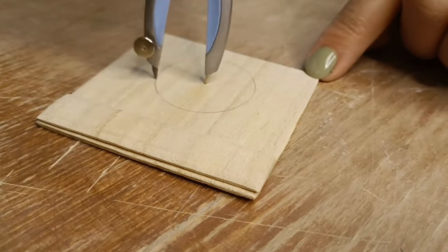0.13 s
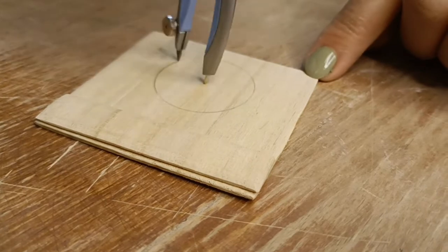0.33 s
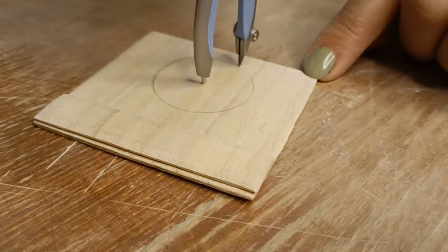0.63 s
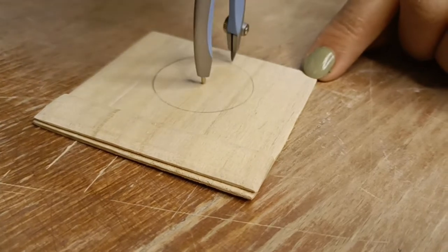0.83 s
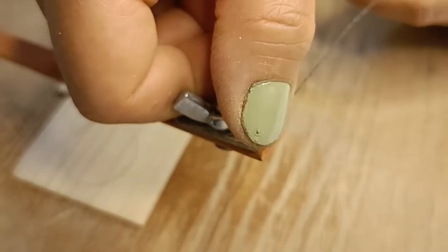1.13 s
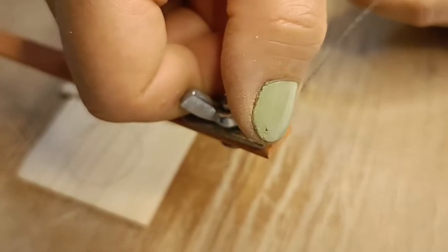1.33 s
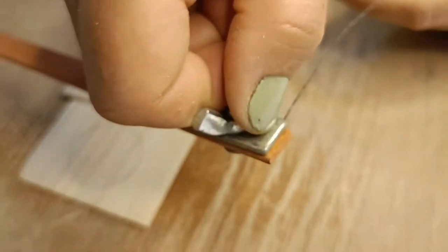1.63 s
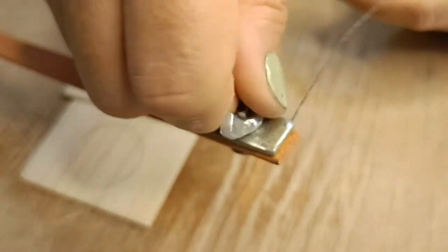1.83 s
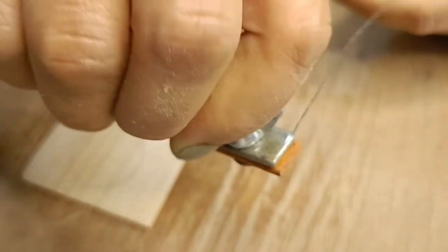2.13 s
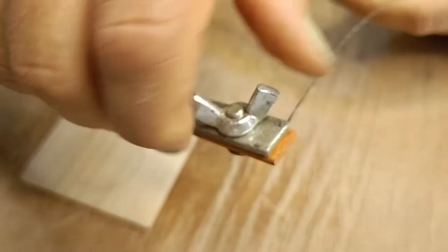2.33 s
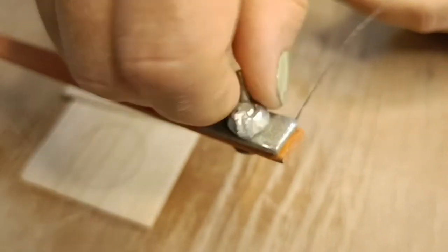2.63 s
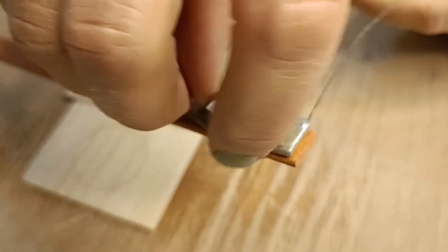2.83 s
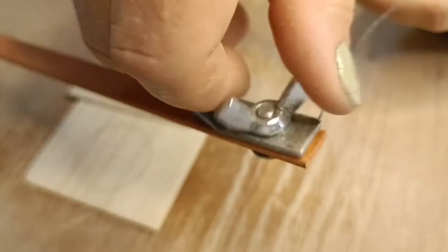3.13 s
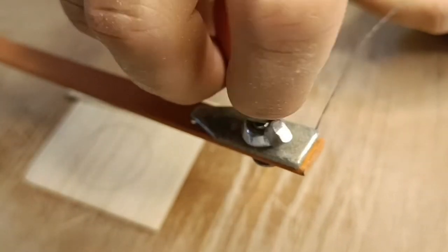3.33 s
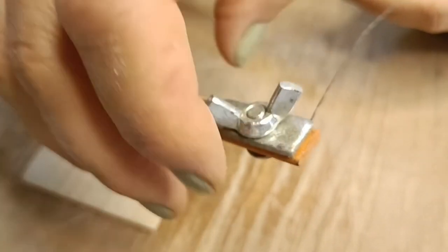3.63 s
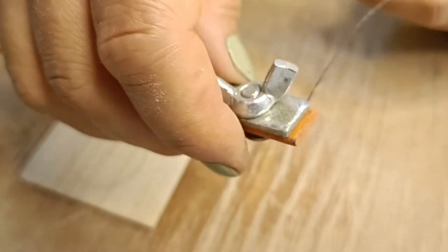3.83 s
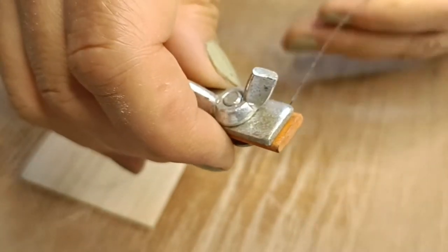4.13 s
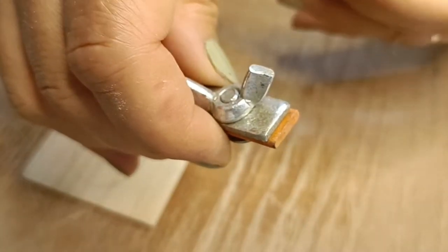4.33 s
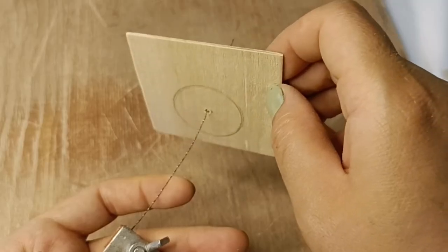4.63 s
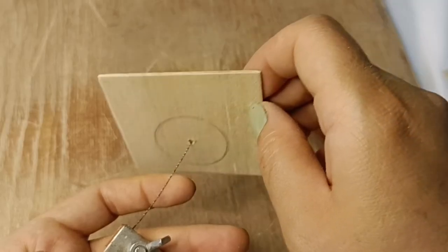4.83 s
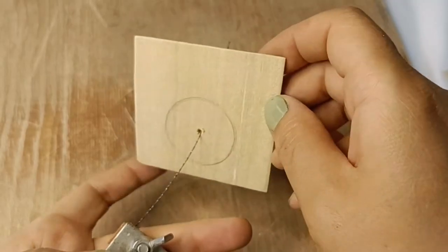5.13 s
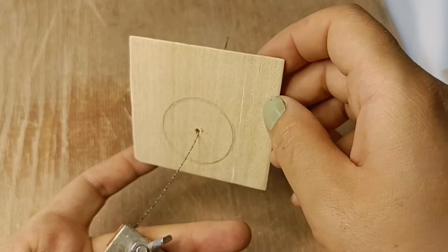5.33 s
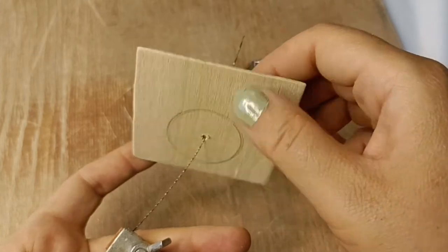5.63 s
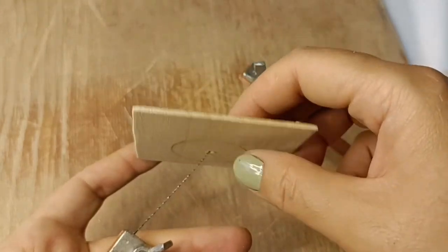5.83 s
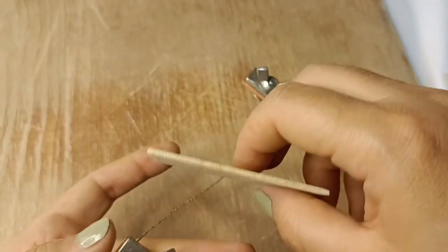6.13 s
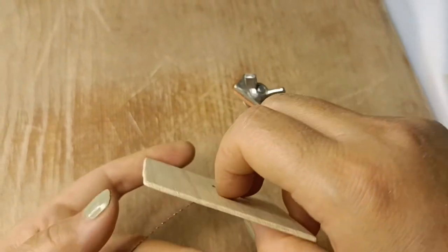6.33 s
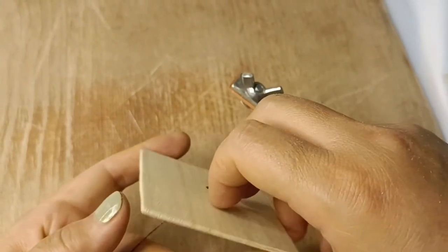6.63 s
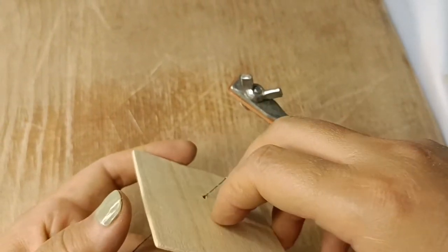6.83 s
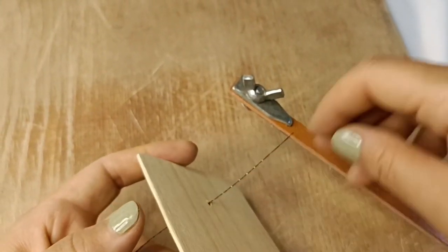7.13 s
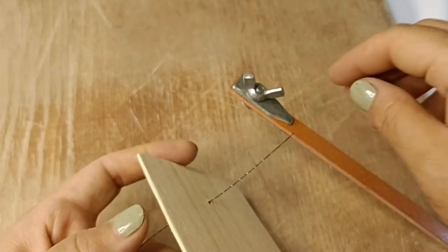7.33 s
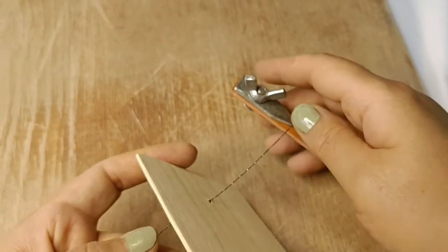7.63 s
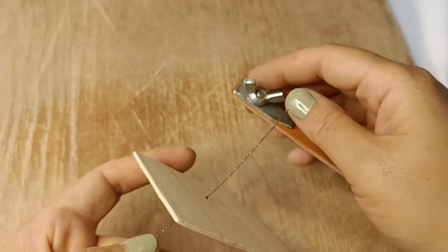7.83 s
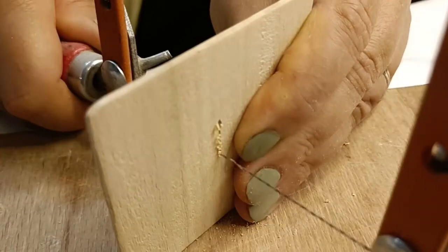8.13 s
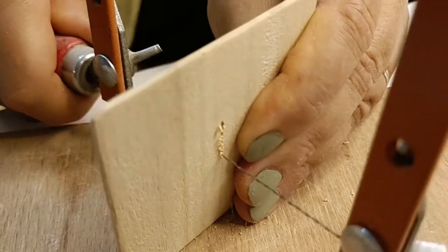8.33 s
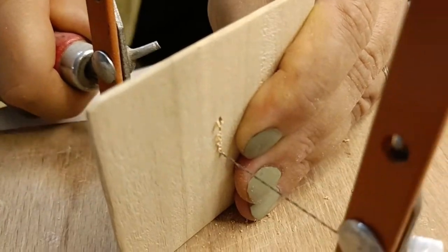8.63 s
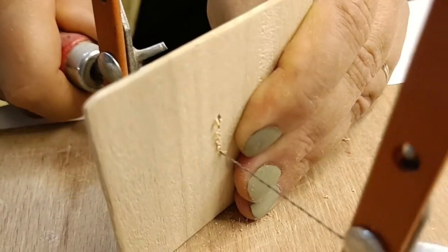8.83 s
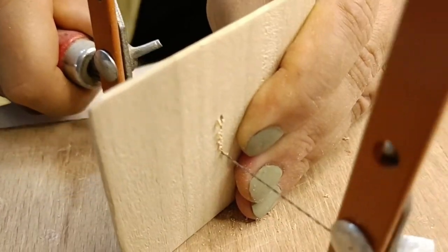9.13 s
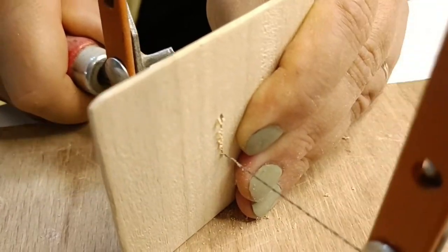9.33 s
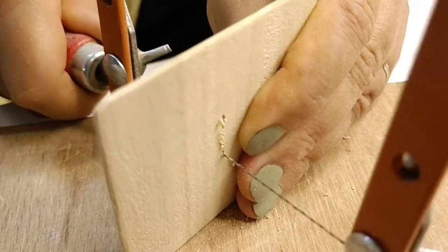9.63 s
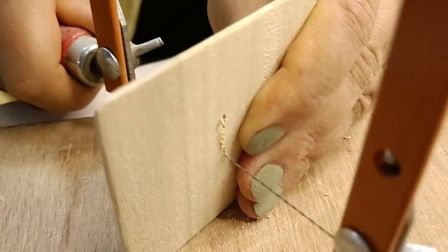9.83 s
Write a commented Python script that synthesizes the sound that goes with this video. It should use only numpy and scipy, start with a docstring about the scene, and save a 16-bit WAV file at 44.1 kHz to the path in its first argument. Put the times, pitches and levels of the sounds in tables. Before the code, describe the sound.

Close, dry stereo sound of craft work at a wooden table, with soft room noise. First a light gritty compass turn, then irregular bright metal clicks over a low, slowly rising far motor hum. Next, blade teeth scratch and catch on wood, with short hisses and small ticks. It ends with energetic fret sawing, about seven strokes a second, crackling with snags and hollow board knocks.

```python
"""Fretwork at a craft table.

In a small room a compass scratches a circle on thin plywood, a wing nut slips tight on a fret saw while
a distant motor hums, and the blade is threaded through a hole in the board. Then the saw cuts in quick strokes.
Contacts are force envelopes on noise through band-pass resonances, the motor is sines, the air is shaped noise.
"""
import sys
import numpy as np
from scipy import signal
from scipy.fft import rfft, irfft
from scipy.io import wavfile
from scipy.ndimage import uniform_filter1d

SR = 44100
rng = np.random.default_rng(int(sys.argv[2]) if len(sys.argv) > 2 else 0)


def persist_wave(psi):
    """Save psi, clipped to +-1, as 16-bit WAV."""
    counts = np.round(np.clip(psi, -1, 1) * 32767).astype(np.int16)
    wavfile.write(sys.argv[1], SR, np.atleast_2d(counts).T)


N = 440118
T = np.arange(N) / SR

# Levels in the tables are nominal: the functions add mix gains and random spread.
# Left-right is the level of the left channel over the right.

# Room noise. Each row: time in seconds, low level in dB, high level in dB.
AIR_CURVE = [(0, -74.5, -74), (1.04, -73.5, -81.5), (1.07, -69, -75.5), (4.3, -66.5, -71.5),
             (5.4, -68, -74.5), (7.8, -65, -72.5), (9.98, -70.5, -69.5)]
# Colour of the rumble. Each row: frequency in Hz, relative density in dB.
RUMBLE_SPECTRUM = [(15, -70), (25, -56), (48, -14), (97, 2), (332, -5.5), (470, -9), (554, -11.5),
                   (607, -11), (666, -14.5), (909, -13.5), (1790, -35), (2000, -34), (2600, -64),
                   (4400, -120)]
# Colour of the hiss. Each row: frequency in Hz, relative density in dB.
HISS_SPECTRUM = [(880, -4), (1500, -3.5), (2460, -4.5), (2740, -4), (3380, -6), (3840, -2), (5440, -14.5),
                 (6430, -12), (7170, -17), (8570, -9), (9370, -13.5), (13400, -10.5), (16000, -7.5)]

# Pressure of the compass point through its one turn. Each row: time in seconds, hiss in dB.
COMPASS_PRESSURE = [(0.0, -69), (0.08, -85), (0.17, -71), (0.25, -79), (0.35, -75.5), (0.44, -77.5),
                    (0.548, -64.5), (0.625, -70), (0.675, -68), (0.8, -97.5)]
# Compass resonances. Each row: centre in Hz, width in Hz, level in dB, left-right in dB.
POINT_MODES = [(1930, 270, -10, -18), (3520, 1500, -6.5, -8), (4350, 320, 5.5, 9), (6200, 1300, -4.5, 5),
               (8950, 2000, -5, 21.5), (11900, 3800, -8.5, 18), (14500, 2400, -8, 0)]
# Table under the compass. Each row: centre in Hz, width in Hz, level in dB, left-right in dB.
TABLE_MODES = [(195, 92, -2, 10), (315, 110, -0.5, 9), (547, 190, -3.5, 10), (890, 300, -9.5, 1),
               (1390, 1400, -25, -21)]

# Soft thumps of hands and wood on the table. Each row: time in seconds, level in dB.
THUMPS = [(0.165, -64), (1.692, -53.5), (4.65, -55.5), (5.968, -60), (6.059, -57), (8.057, -53)]
# Dull ticks of wood. Each row: time in seconds, knock in dB, snap in dB.
WOOD_TICKS = [(6.0595, -50.5, -59.5), (7.633, -47, -43), (7.877, -58.5, -63), (7.932, -63, -58.5)]
# Ticking wood, two knock then two snap modes. Each row: centre in Hz, width in Hz, level in dB, left-right in dB.
TICK_MODES = [(646, 590, -6, 0), (1300, 560, 6, 4), (2230, 700, 1, -3), (3300, 310, -17, -12)]
# Table top under saw and thumps. Each row: centre in Hz, width in Hz, level in dB, left-right in dB.
BENCH_MODES = [(130.4, 60, -3.5, -2), (189.4, 70, 0.5, -3), (257.6, 98, 2, -3), (324, 118, -11.5, -5)]

# Short bright brush against the frame. Each row: time in seconds, level in dB.
BRUSH_CURVE = [(1.058, -88), (1.065, -55.5), (1.085, -58), (1.12, -73), (1.19, -98)]
# Brushed frame. Each row: centre in Hz, width in Hz, level in dB, left-right in dB.
BRUSH_MODES = [(1360, 250, 0.5, 0), (3700, 1000, 7.5, 0), (5500, 7200, -3, 0), (8970, 490, 12.5, 0),
               (9800, 580, 6, 0)]
# Wing nut slips on its thread. Each row: time in seconds, clamp ring in dB, its treble in dB, frame knock in dB.
NUT_SLIPS = [(1.5716, -45, -60, -62), (1.6925, -48, -52.5, -59), (2.245, -52, -69, -70.5),
             (2.2595, -45.5, -61.5, -63.5), (2.379, -51.5, -58.5, -63), (2.652, -54, -50, -69),
             (2.6651, -45.5, -65.5, -63), (2.7302, -33, -37.5, -55), (2.7684, -60, -72, -64),
             (2.8424, -47.5, -57, -62.5), (3.2615, -55, -65, -66), (3.2779, -45.5, -56, -55),
             (3.3816, -50.5, -54.5, -60), (3.4014, -61.5, -56.5, -59), (3.5303, -59.5, -74.5, -77.5),
             (3.658, -59, -71, -65), (4.0668, -59.5, -56.5, -72)]
# Steel clamp, lower modes. Each row: centre in Hz, width in Hz, level in dB, left-right in dB.
CLAMP_LOW_MODES = [(2860, 180, 7, -6), (3140, 670, 6.5, -6), (4090, 230, 4, -9), (4200, 560, 3, -9)]
# Steel clamp, upper modes. Each row: centre in Hz, width in Hz, level in dB, left-right in dB.
CLAMP_HIGH_MODES = [(5230, 2800, -10.5, -1), (6900, 660, -2, -5.5), (8100, 370, -0.5, -11),
                    (8660, 1500, -0.5, 0), (10200, 5000, -12, 5), (13250, 360, -4, 11),
                    (14600, 1800, -12, 13)]
# Frame knocked by the nut. Each row: centre in Hz, width in Hz, level in dB, left-right in dB.
CLAMP_KNOCK_MODES = [(630, 170, -8.5, 1), (978, 137, 0, 2), (1520, 250, -19.5, -17)]
# Fingers rub on the nut. Each row: time in seconds, level in dB.
NUT_RUB_CURVE = [(2.1, -91), (2.2, -68.5), (2.26, -74), (2.35, -79)]
# Bright top of the nut's sharpest clicks. Each row: time in seconds, level in dB.
SLIP_TREBLE = [(1.692, -44), (1.699, -47.5), (2.244, -57), (2.653, -72), (4.067, -57.5)]
# Bands of that bright top. Each row: centre in Hz, width in Hz, level in dB, left-right in dB.
SLIP_TREBLE_MODES = [(6500, 4900, -1.5, 0), (10000, 4500, -4.5, 12), (13700, 1200, 6, 8),
                     (15300, 1600, 0, 6)]

# Distant motor. Each row: time in seconds, first harmonic in dB, third harmonic in dB, drone in dB.
MOTOR_CURVE = [(1.07, -59, -75.5, -73.5), (1.9, -57.5, -74, -75.5), (2.45, -55, -68.5, -80),
               (2.76, -57, -68.5, -69), (3.3, -80, -66.5, -70.5), (3.56, -62, -63, -68),
               (4.0, -64.5, -62, -65.5), (4.46, -67.5, -65.5, -61.5)]

# Nut grinds on its washer. Each row: start in seconds, length in seconds, fastest moment as share of length, dB.
NUT_GRIND = [(2.365, 0.063, 0.35, -68), (2.72, 0.25, 0.2, -72), (3.23, 0.203, 0.78, -71),
             (3.6, 0.14, 0.54, -71)]

# Blade slides in the hole. Each row: start in seconds, length in seconds, fastest moment as share of length, dB.
THREADING_SLIDES = [(4.455, 0.1, 0.12, -68), (4.53, 0.097, 0.57, -65), (4.855, 0.071, 0.2, -60),
                    (4.94, 0.073, 0.79, -60.5), (5.087, 0.095, 0.55, -51), (5.525, 0.076, 0.4, -72),
                    (5.6, 0.043, 0.65, -66), (5.715, 0.13, 0.17, -66.5), (5.78, 0.15, 0.79, -64.5)]
# Blade teeth catch on the rim. Each row: time in seconds, low ring in dB, scratch in dB.
CATCHES = [(4.547, -56, -51.5), (4.581, -49.5, -52), (4.646, -40, -40.5), (4.66, -39.5, -41),
           (4.867, -49.5, -47), (4.882, -47.5, -41.5), (4.922, -50, -47), (4.928, -47, -48),
           (4.959, -59, -58), (5.097, -57, -44.5), (5.148, -50, -37), (5.84, -78, -55.5),
           (5.969, -52, -45.5)]
# Scraped blade, lower modes. Each row: centre in Hz, width in Hz, level in dB, left-right in dB.
BLADE_LOW_MODES = [(450, 86, 5, 2), (973, 315, 5, 3.5), (1710, 260, -7, 8), (2267, 260, 6, 0),
                   (2610, 160, 1, 3), (3280, 600, 0, -3.5), (3940, 400, 3, -7), (4470, 420, -4.5, 4)]
# Scraped blade, upper modes. Each row: centre in Hz, width in Hz, level in dB, left-right in dB.
BLADE_HIGH_MODES = [(5640, 300, 7.5, -9), (6360, 380, 3.5, 1), (6600, 450, 5, -11), (7500, 310, 1.5, -9),
                    (8360, 160, 6, 4.5), (8800, 1700, 4, -1.5), (10200, 530, -2, 4),
                    (11500, 3900, -5.5, 16), (13100, 630, 2.5, 3), (14600, 1700, -6, 21)]
# Slack blade is plucked by a catch. Each row: time in seconds, level in dB.
PLUCKS = [(4.661, -64), (4.884, -76.5)]
# Ringing slack blade. Each row: centre in Hz, width in Hz, level in dB, left-right in dB.
SLACK_BLADE_MODES = [(2258, 12, 4, -4), (5690, 40, -16, 5)]

# Low woody knock under the blade catches. Each row: time in seconds, level in dB.
CATCH_KNOCKS = [(4.582, -61.5), (4.649, -46), (4.661, -46.5), (4.885, -60), (4.925, -52.5), (5.969, -58)]
# Hand-held board. Each row: centre in Hz, width in Hz, level in dB, left-right in dB.
HELD_BOARD_MODES = [(414, 72, 10, 2), (804, 260, 3, 1), (1116, 170, 3.5, -4), (1600, 750, -21, -9),
                    (2290, 130, -6, -2)]

# Board pushed along blade. Each row: start in seconds, length in seconds, fastest moment as share of length, dB.
PUSHES = [(6.17, 0.32, 0.35, -71), (6.42, 0.125, 0.66, -66.5), (6.645, 0.12, 0.5, -71.5),
          (6.725, 0.12, 0.27, -56), (6.855, 0.061, 0.37, -61), (6.935, 0.069, 0.37, -69),
          (7.035, 0.072, 0.36, -67.5)]
# Board jerks on the teeth. Each row: time in seconds, level in dB.
JERKS = [(6.44, -53), (6.7383, -38.5), (6.753, -45), (6.8809, -48), (6.9015, -44.5)]
# Rubbing hiss of board or nut. Each row: centre in Hz, width in Hz, level in dB, left-right in dB.
RUB_HISS_MODES = [(4270, 740, -5.5, -2), (6150, 1200, -8, -10.5), (8600, 1700, -1.5, -2),
                  (10500, 680, -2, -4), (12800, 2900, -7, 7), (14900, 1800, -18, 17)]
# Ring of the pushed board. Each row: centre in Hz, width in Hz, level in dB, left-right in dB.
PUSH_RING_MODES = [(490, 74, 4, 0), (1160, 430, 0, 0), (1540, 290, -3.5, -6), (2240, 500, -2, 0),
                   (3350, 270, 2, -13), (6370, 410, -4.5, -21), (6870, 310, 0, -12)]
# Blade squeaks as the frame is taken up. Each row: time in seconds, level in dB.
SQUEAK_CURVE = [(7.805, -85), (7.822, -56), (7.83, -68.5), (7.843, -61), (7.87, -85)]
# Squeaking blade. Each row: centre in Hz, width in Hz, level in dB, left-right in dB.
SQUEAK_MODES = [(1340, 320, 6, -2), (3310, 235, 2, -12), (6680, 230, 6.5, -14), (9500, 11700, -14, 0)]

# Two short nudges, then full saw strokes. Each row: start in seconds, length in seconds,
# fastest moment as share of length, tooth rasp in dB, drag on the frame in dB, bite into the board in dB.
STROKES = [(7.947, 0.055, 0.1, -56, -51, -57), (8.036, 0.06, 0.48, -53.5, -55, -53),
           (8.166, 0.091, 0.53, -44, -48, -48.5), (8.288, 0.155, 0.49, -43, -43.5, -43.5),
           (8.43, 0.143, 0.52, -41.5, -41, -41.5), (8.585, 0.126, 0.5, -44.5, -44, -44.5),
           (8.698, 0.164, 0.69, -42, -43.5, -44.5), (8.858, 0.133, 0.52, -43.5, -43, -42.5),
           (8.993, 0.126, 0.43, -44.5, -43, -43.5), (9.151, 0.127, 0.29, -45, -45.5, -46.5),
           (9.273, 0.148, 0.5, -36, -39, -38), (9.411, 0.151, 0.56, -41, -42, -42.5),
           (9.55, 0.128, 0.54, -42, -43, -43), (9.706, 0.156, 0.43, -44, -46.5, -44.5),
           (9.844, 0.136, 0.59, -38, -41.5, -40)]
# A tooth snags hard. Each row: time in seconds, frame jolt in dB, crack in dB, board knock in dB.
SNAGS = [(7.9524, -46, -48, -47), (8.0591, -39.5, -39.5, -31), (8.1875, -44, -36, -39.5),
         (8.2231, -50, -41, -39), (8.3743, -38, -52, -32), (8.4017, -46, -35.5, -48),
         (8.5078, -28.5, -30, -38), (8.519, -37, -36, -40), (8.542, -39, -34, -43),
         (8.6083, -45, -52, -39.5), (8.6608, -30.5, -38, -28), (8.8019, -33.5, -33, -34),
         (8.8832, -35.5, -45.5, -27), (8.9065, -38, -49, -31), (9.0205, -39, -55, -40.5),
         (9.0851, -32, -32, -35), (9.1772, -40, -41, -23.5), (9.182, -28.5, -39, -32),
         (9.3062, -28.5, -33, -37), (9.3321, -32.5, -45, -30), (9.4839, -31, -48, -23),
         (9.725, -39, -43, -31.5), (9.7822, -24, -33, -25), (9.9024, -37, -43, -26.5),
         (9.9333, -37, -30, -27)]
# Sawn board. Each row: centre in Hz, width in Hz, level in dB, left-right in dB.
BOARD_MODES = [(487, 170, -10, -3.5), (707, 200, -7, -6.5), (903, 127, 3, -8.5), (1070, 128, -7.5, -19),
               (1375, 273, 0.5, -11), (1660, 250, -1, -9)]
# Saw frame. Each row: centre in Hz, width in Hz, level in dB, left-right in dB.
FRAME_MODES = [(2160, 380, -2, -11.5), (2537, 270, -3.5, -24.5), (2792, 260, 3, -16.5),
               (3160, 690, -3.5, -11.5), (4240, 650, -3.5, -5.5)]
# Saw teeth. Each row: centre in Hz, width in Hz, level in dB, left-right in dB.
TEETH_MODES = [(6500, 1340, -13, 14), (8280, 780, 0, 22.5), (8960, 240, -3, 27), (10540, 2800, -4, 20.2),
               (13280, 810, -3.5, 26), (14100, 1400, -8, 10)]

COMPASS_RUMBLE_DB = -1.5  # table rumble relative to the hiss
MOTOR_HZ, MOTOR_RISE_HZ_PER_S = 101.8, 2.2  # mean pitch at onset, mean climb
DRONE_HZ = 277  # mean
RUB_POWER, CUT_POWER = 1.2, 2.2  # force grows as this power of speed
TEETH_PER_S = 270  # mean, at top stroke speed
SAWING_FROM_S, TURN_DRAG_DB, TURN_BITE_DB = 8.4, -63.5, -62  # floor of frame and board force once under way
WOOD_GRAIN_DB, WOOD_GRAIN_PER_S = 1.5, 60  # hard and soft grain
SMALL_SNAGS_PER_S, SMALL_SNAG_DB = 45, 1  # random; height over the resistance, before normalizing
CUTOFF_HZ = 16100


def from_db(db):
    """Decibels to amplitude ratio."""
    return 10 ** (np.asarray(db) / 20)


def rms_one(x):
    """Scale to RMS 1."""
    return x / np.sqrt(np.mean(x ** 2) + 1e-20)


def level(rows, axis):
    """Gain in time from one dB column of a curve; silent outside it."""
    columns = np.transpose(rows)
    root_gain = np.interp(T, columns[0], from_db(columns[axis]) ** .5, 0, 0)
    return np.abs(uniform_filter1d(root_gain ** 2, 64))


def drift(knots_per_s):
    """Random wander of RMS 1: straight lines between Gaussian knots."""
    knots = rng.standard_normal(N // 20)
    return rms_one(np.interp(T * knots_per_s, np.arange(len(knots)), knots))


def band(x, low_hz, high_hz, order=2):
    """Butterworth band-pass: one resonance."""
    edges_hz = [max(low_hz, 10), min(high_hz, .48 * SR)]
    return signal.sosfilt(signal.butter(order, edges_hz, "band", fs=SR, output="sos"), x + 1e-18)


def body(force, modes, order=2, apart_db=-2.5, wander_db=-4.0):
    """Rough contact rings every resonance, each wandering in level as the contact moves; unit force, unit level.

    apart_db: noise private to each channel over shared noise. wander_db: scale of the level wander.
    """
    out, power = np.zeros((2, N)), 0
    live = np.flatnonzero(force > force.max() * from_db(-70))
    span = slice(live[0], min(N, live[-1] + SR // 2))
    t, apart = T[span] - T[live[0]], from_db(apart_db)
    white = rng.standard_normal((2, 3, len(t)))
    mixed = (white[:, :1] + apart * white[:, 1:]) / np.hypot(1, apart)
    grit = mixed * force[span]
    for k, (hz, width_hz, db, pan_db) in enumerate(modes):
        sides = from_db([db + pan_db / 2, db - pan_db / 2])
        wander = np.interp(20 * t, np.arange(200), rng.uniform(-1.3, 1.3, 200))
        ring = band(grit[k % 2], hz - width_hz / 2, hz + width_hz / 2, order=order)
        out[:, span] += sides[:, None] * from_db(wander_db * wander) * ring
        power += sides.mean() ** 2 * 2 * width_hz / SR
    return out / np.sqrt(power)


def fade(clicks, decay_s):
    """Each click starts a decay of its own height, with time constant decay_s."""
    return signal.lfilter([1], [1, -np.exp(-1 / (decay_s * SR))], clicks + 1e-18)


def blows(rows, axis, decay_s, build_s=.0006):
    """Force envelope of short contacts: each builds up, lets go and dies away."""
    clicks = np.zeros(N)
    clicks[[round(row[0] * SR) for row in rows]] = from_db([row[axis] for row in rows])
    build = fade(clicks[::-1], build_s)[::-1]
    return np.maximum(fade(clicks, decay_s), build)


def fibres(per_s, spread_db, decay_s):
    """Wood fibres break at random, a few of them loudly; mean power 1."""
    sizes = from_db(spread_db * np.minimum(rng.exponential(1, N), 4))
    breaks = rng.random(N) < per_s / SR
    return rms_one(np.sqrt(fade(sizes ** 2 * breaks, decay_s)))


def hand_speed(row):
    """A hand starts from rest, reaches speed 1 along the move and stops again."""
    start_s, length_s, fastest = row[:3]
    moments_s = start_s + length_s * np.array([0, np.clip(fastest, .03, .97), 1])
    return np.sin(np.pi * np.interp(T, moments_s, [0, .5, 0]))


def moves(rows, axis, power):
    """Force envelope of hand moves: force follows a power of speed."""
    force = np.zeros(N)
    for row in rows:
        speed = hand_speed(row)
        moving = speed > 0
        force[moving] += from_db(row[axis]) * speed[moving] ** power
    return force


def left_late(x, lag_ms):
    """Delay the left channel, as for sound from the right; a negative lag advances it."""
    return np.array([np.interp(T - lag_ms / 1000, T, x[0]), x[1]])


def room(x, wet_db, t60):
    """Diffuse reflections: decaying noise tails, different in each channel; t60 in seconds."""
    t = T[:SR // 2]
    tails = rng.standard_normal((2, len(t))) * from_db(-60 * t / t60) * (1 - np.exp(-t / 0.001))
    tails /= np.sqrt(np.sum(tails ** 2, axis=1, keepdims=True))
    return x + from_db(wet_db) * signal.oaconvolve(x, tails, axes=1)[:, :N]


def noise(spectrum, side_db):
    """Steady stereo noise of a given colour; side_db is side over mid."""
    hz, db = np.transpose(spectrum)
    log_hz = np.log(np.arange(N // 2 + 1) * SR / N + 1)
    gain = from_db(np.interp(log_hz, np.log(hz), db))
    mid, side = irfft(rfft(rng.standard_normal((2, N))) * gain, N)
    return rms_one(mid) + from_db(side_db) * rms_one(side) * [[1], [-1]]


def air():
    """Room rumble, mostly alike in both channels, with a wide faint hiss."""
    rumble = level(AIR_CURVE, axis=1) * noise(RUMBLE_SPECTRUM, side_db=-5.5)
    hiss = level(AIR_CURVE, axis=2) * noise(HISS_SPECTRUM, side_db=1.0)
    return rumble + hiss


def compass():
    """The point drags over the grain, and the board passes its rumble to the table."""
    force = level(COMPASS_PRESSURE, axis=1) * fibres(per_s=2300, spread_db=2.5, decay_s=0.0015)
    return body(force, POINT_MODES) + body(from_db(COMPASS_RUMBLE_DB) * force, TABLE_MODES)


def ticks():
    """Small dry ticks of wood and soft thumps on the table: short forces ring broad resonances."""
    knock = body(blows(WOOD_TICKS, axis=1, decay_s=0.0018), TICK_MODES[:2])
    crisp = body(blows(WOOD_TICKS, axis=2, decay_s=0.00085), TICK_MODES[2:])
    thump = body(blows(THUMPS, axis=1, decay_s=0.015), BENCH_MODES)
    return room(knock + crisp, wet_db=-5.5, t60=0.27) + room(thump, wet_db=-12, t60=0.22)


def wing_nut():
    """Each slip of the nut rings the steel clamp and knocks the frame; a brush and rubbing fingers hiss."""
    low_force = blows(NUT_SLIPS, axis=1, decay_s=0.0029, build_s=0.00074)
    high_force = blows(NUT_SLIPS, axis=2, decay_s=.004, build_s=.001)
    low = body(low_force, CLAMP_LOW_MODES, apart_db=-2, wander_db=-1.5)
    high = body(high_force, CLAMP_HIGH_MODES, apart_db=4.0, wander_db=-0.5)
    knock = body(blows(NUT_SLIPS, axis=3, decay_s=0.0042), CLAMP_KNOCK_MODES)
    brush = body(level(BRUSH_CURVE, axis=1), BRUSH_MODES)
    rub = body(level(NUT_RUB_CURVE, axis=1), RUB_HISS_MODES, apart_db=6)
    return room(left_late(low + high + knock + brush + rub, lag_ms=0.026), wet_db=-6.5, t60=0.21)


def motor():
    """A far motor slowly gains speed, as three harmonics, beside a wavering drone of level pitch."""
    hz = MOTOR_HZ + MOTOR_RISE_HZ_PER_S * (T - MOTOR_CURVE[0][0])
    turn = 2 * np.pi * np.cumsum(hz + 0.58 * drift(14)) / SR
    hum = level(MOTOR_CURVE, axis=1) * (np.sin(turn) + from_db(-19) * np.sin(2 * turn))
    third = level(MOTOR_CURVE, axis=2) * np.sin(3 * turn)
    drone_gain = level(MOTOR_CURVE, axis=3) * from_db(3.0 * drift(8))
    drone_turn = 2 * np.pi * np.cumsum(DRONE_HZ + 4 * drift(25)) / SR
    drone = drone_gain * np.sin(drone_turn)
    return (hum + third + drone) * from_db(.7 * drift(9))


def nut_grind_and_treble():
    """The nut grinds in tiny jerks that ring the clamp; its sharpest clicks get a bright top."""
    grind = moves(NUT_GRIND, axis=3, power=RUB_POWER) * fibres(per_s=400, spread_db=5.0, decay_s=0.0013)
    steel = body(grind, CLAMP_LOW_MODES + CLAMP_HIGH_MODES, apart_db=5)
    treble_force = blows(SLIP_TREBLE, axis=1, decay_s=.003, build_s=.001)
    treble = body(treble_force, SLIP_TREBLE_MODES, apart_db=10)
    return room(steel + treble, wet_db=-24, t60=.28)


def threading():
    """Fine teeth scrape the rim of the hole; hard catches leave the slack blade ringing."""
    grit = fibres(per_s=700, spread_db=2.5, decay_s=0.0015)
    slide = moves(THREADING_SLIDES, axis=3, power=RUB_POWER) * grit
    catch = blows(CATCHES, axis=1, decay_s=.004, build_s=0.0014)
    scratch = blows(CATCHES, axis=2, decay_s=.005, build_s=0.00083)
    low = body(from_db(-6) * slide + catch, BLADE_LOW_MODES, apart_db=3, wander_db=3.0)
    high = body(slide + scratch, BLADE_HIGH_MODES, apart_db=17.0, wander_db=2.0)
    ring = body(blows(PLUCKS, axis=1, decay_s=0.056), SLACK_BLADE_MODES, order=1)
    return room(left_late(low + high + ring, lag_ms=0.038), wet_db=-14.0, t60=0.31)


def catch_knocks():
    """Low woody knock under the blade catches: short forces ring the hand-held board."""
    force = blows(CATCH_KNOCKS, axis=1, decay_s=.005, build_s=.0015)
    return room(body(force, HELD_BOARD_MODES), wet_db=-11, t60=.3)


def pushing():
    """The board hisses along the blade in jerks, and the blade squeaks briefly."""
    slide = moves(PUSHES, axis=3, power=RUB_POWER) * fibres(per_s=1700, spread_db=1, decay_s=.001)
    jerk = blows(JERKS, axis=1, decay_s=0.0013, build_s=0.00085)
    hiss = body(slide + from_db(-19) * jerk, RUB_HISS_MODES, apart_db=7, wander_db=-0.5)
    ring_force = from_db(-6) * slide + from_db(-7.5) * jerk
    ring = body(ring_force, PUSH_RING_MODES, apart_db=4.5, wander_db=2.5)
    squeak = body(level(SQUEAK_CURVE, axis=1), SQUEAK_MODES)
    return room(hiss + ring + squeak, wet_db=-12.5, t60=0.46)


def tooth_pulses(speed, top_rate):
    """Teeth pass fastest in mid-stroke, with bites of uneven size; at the turns a smooth drag is left."""
    rate = top_rate * np.sqrt(speed) * from_db(1.5 * drift(150))
    passed = np.floor(np.cumsum(rate) / SR)
    sizes = (speed > 0) * from_db(3.5 * np.clip(rng.standard_normal(N), -2, 1.2))
    bites = (np.diff(passed, prepend=0) > 0) * sizes
    force = fade(bites, .0012) + .13
    return force / np.sqrt(np.mean(force[speed > .5] ** 2))


def uneven_wood():
    """Resistance of RMS 1: it wavers with the grain and jumps where a tooth catches."""
    catches = fade(rng.random(N) < SMALL_SNAGS_PER_S / SR, decay_s=.0015)
    grain = from_db(WOOD_GRAIN_DB * drift(WOOD_GRAIN_PER_S))
    return rms_one(grain * (1 + from_db(SMALL_SNAG_DB) * catches))


def snap(rows, axis, modes):
    """A fibre gives way at once and strikes every resonance; a unit click gives about a unit peak."""
    out, peak = np.zeros((2, N)), 0
    at = np.array([round(row[0] * SR) for row in rows])
    first = at[0] - 200
    for k, (hz, width_hz, db, pan_db) in enumerate(modes):
        sides = from_db([db + pan_db / 2, db - pan_db / 2])
        clicks = np.zeros(N)
        clicks[at] = from_db(np.array(rows)[:, axis] + rng.uniform(-2.5, 3.0, len(at)))
        ring = band(clicks[first:], hz - width_hz / 2, hz + width_hz / 2)
        out[:, first:] += sides[:, None] * ring * (-1) ** k
        peak += (sides.mean() * np.pi * width_hz / SR) ** 2
    return out / np.sqrt(peak)


def saw():
    """Teeth hiss in the kerf and shake frame and board; the board passes its shaking on to the table."""
    rasp, drag, bite = (moves(STROKES, axis=k, power=CUT_POWER) for k in (3, 4, 5))
    # the blade still presses on frame and board at the turns
    drag = np.hypot(drag, from_db(TURN_DRAG_DB) * (T > SAWING_FROM_S))
    bite = np.hypot(bite, from_db(TURN_BITE_DB) * (T > SAWING_FROM_S))
    speed = sum(hand_speed(row) for row in STROKES)
    teeth = tooth_pulses(speed, top_rate=TEETH_PER_S) * uneven_wood()
    tearing = fibres(per_s=3400, spread_db=0.5, decay_s=0.00021)
    # a snagged tooth splinters the wood for a moment, then snaps free
    jolt = blows(SNAGS, axis=1, decay_s=0.0016, build_s=0.00053)
    crack = blows(SNAGS, axis=2, decay_s=0.0017, build_s=0.00085)
    knock = blows(SNAGS, axis=3, decay_s=0.0014, build_s=0.0013)
    hiss = body(rasp * teeth * tearing + crack, TEETH_MODES, apart_db=5.5, wander_db=2.5)
    frame = body(drag * teeth + from_db(-4.5) * jolt, FRAME_MODES, apart_db=-6.0, wander_db=2.0)
    board = body(bite * teeth + from_db(-5) * knock, BOARD_MODES, apart_db=-9.5, wander_db=6.5)
    bench_force = from_db(-4) * np.sqrt(drag * bite) * teeth + from_db(-11) * knock
    bench = body(bench_force, BENCH_MODES, apart_db=-19.5, wander_db=2.5)
    hiss += snap(SNAGS, axis=2, modes=TEETH_MODES)
    frame += snap(SNAGS, axis=1, modes=FRAME_MODES)
    board += snap(SNAGS, axis=3, modes=BOARD_MODES)
    near = left_late(board + frame, lag_ms=.28) + left_late(bench, lag_ms=0.053)
    near += left_late(hiss, lag_ms=-0.74)
    early = room(near, wet_db=-13.0, t60=0.037)
    return room(early, wet_db=-28.5, t60=0.57)


def scene():
    """Sum of all sources."""
    handling = ticks() + wing_nut() + nut_grind_and_treble() + threading() + catch_knocks() + pushing()
    return air() + compass() + handling + motor() + saw()


def record(dry):
    """Steep elliptic low-pass cuts the top."""
    return signal.sosfilt(signal.ellip(10, .1, 80, CUTOFF_HZ, fs=SR, output="sos"), dry)


dry = scene()
out = record(dry)
persist_wave(out)
```